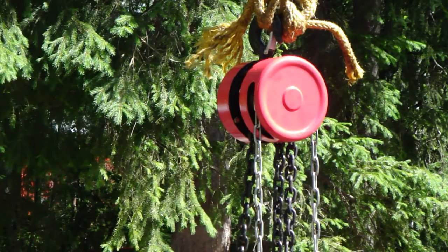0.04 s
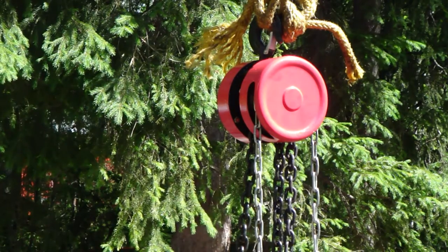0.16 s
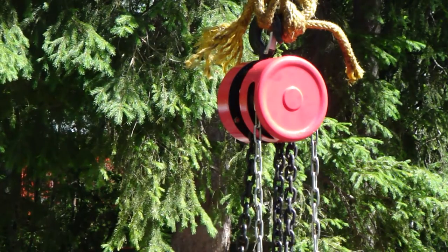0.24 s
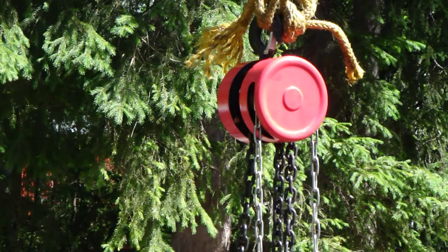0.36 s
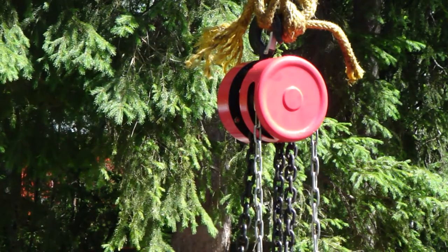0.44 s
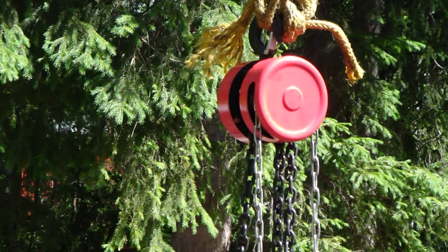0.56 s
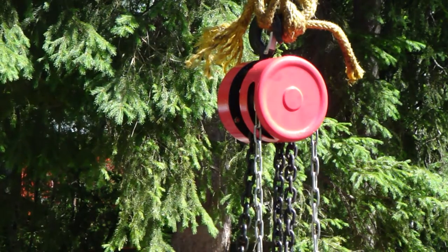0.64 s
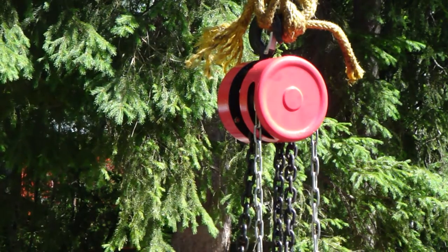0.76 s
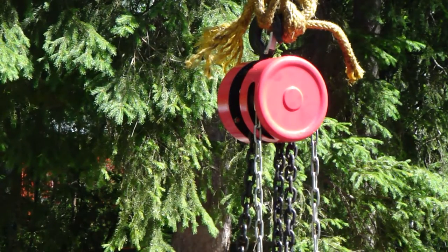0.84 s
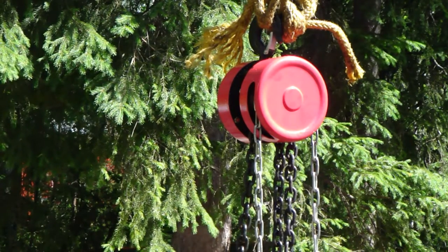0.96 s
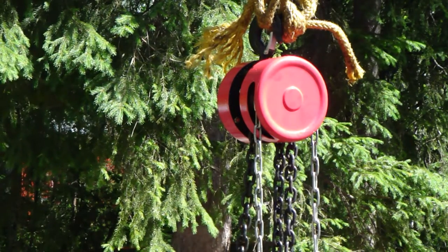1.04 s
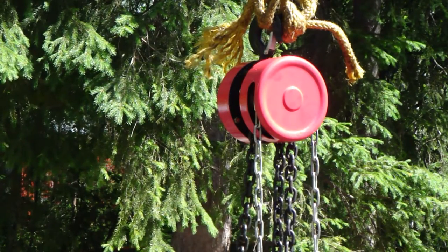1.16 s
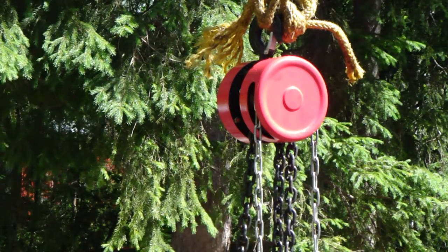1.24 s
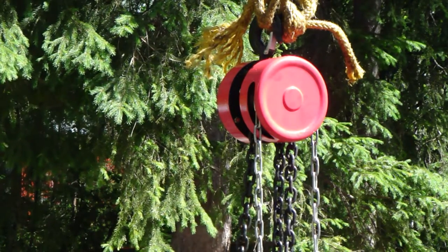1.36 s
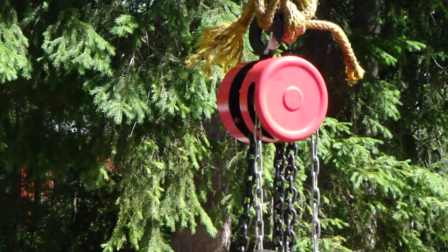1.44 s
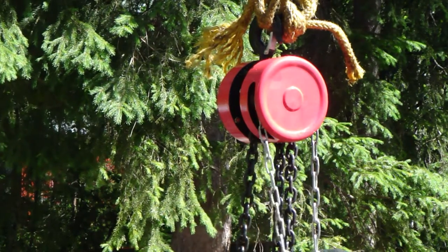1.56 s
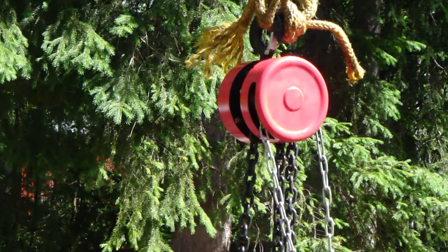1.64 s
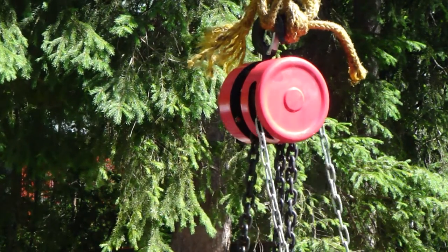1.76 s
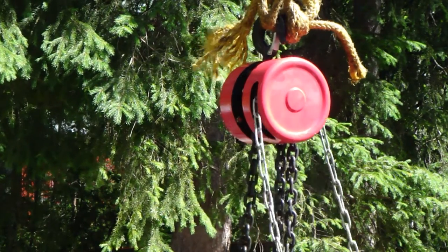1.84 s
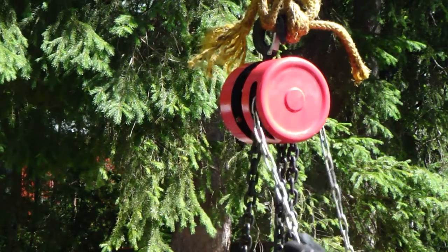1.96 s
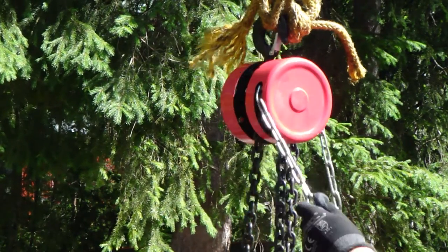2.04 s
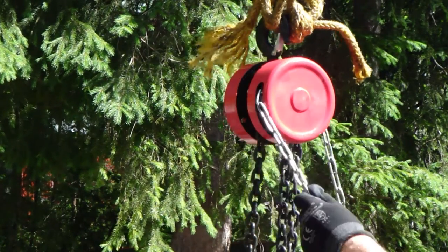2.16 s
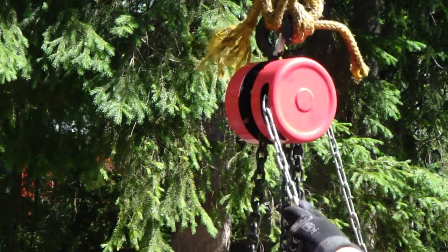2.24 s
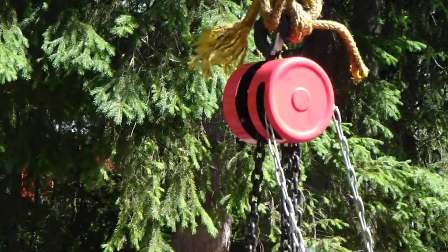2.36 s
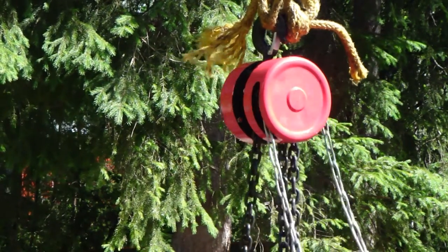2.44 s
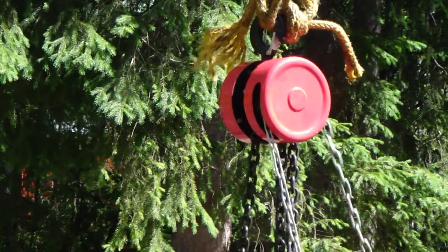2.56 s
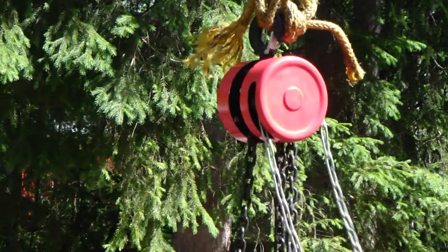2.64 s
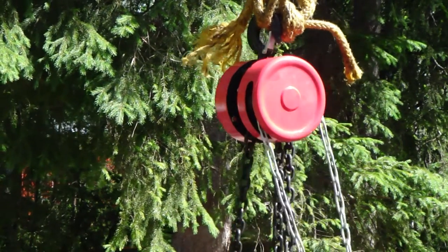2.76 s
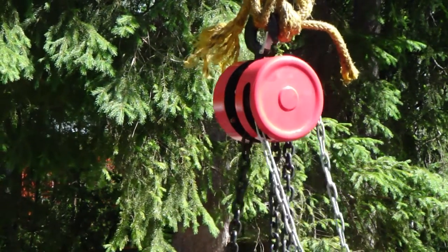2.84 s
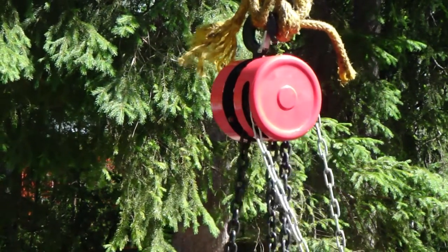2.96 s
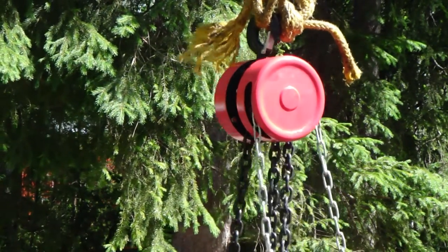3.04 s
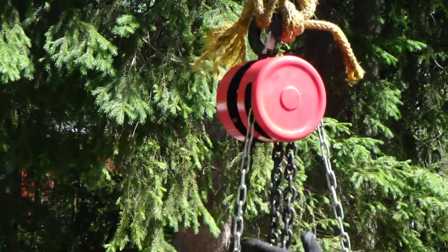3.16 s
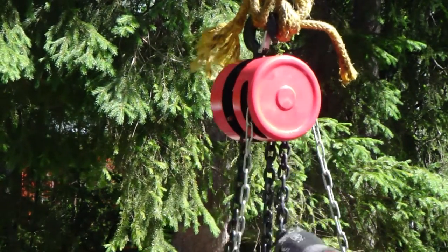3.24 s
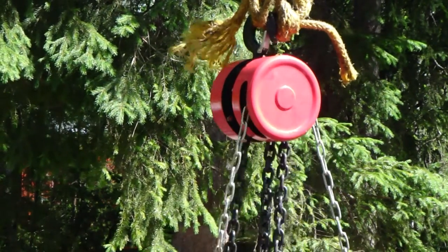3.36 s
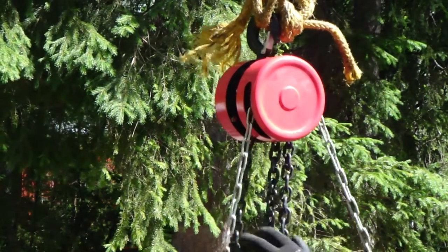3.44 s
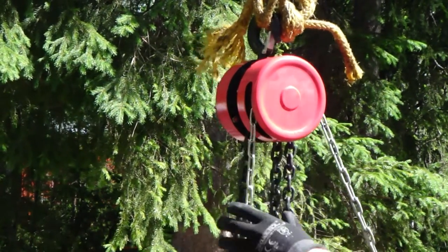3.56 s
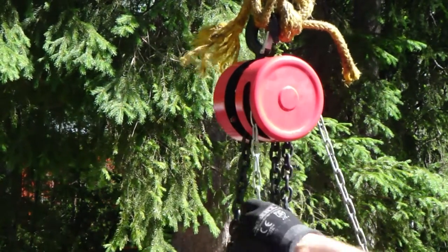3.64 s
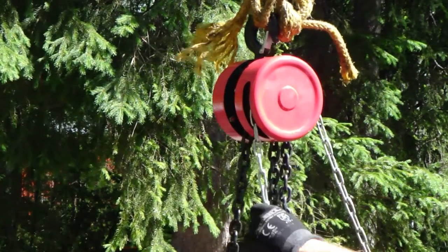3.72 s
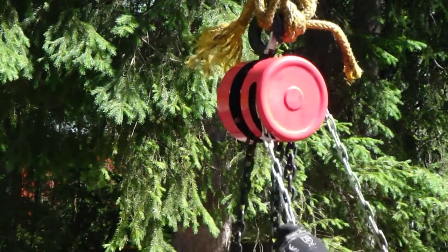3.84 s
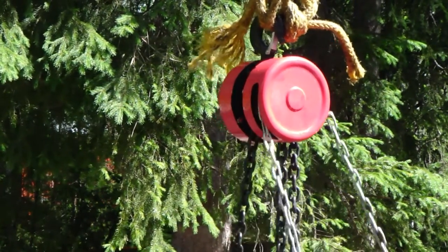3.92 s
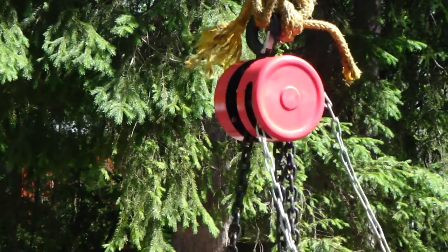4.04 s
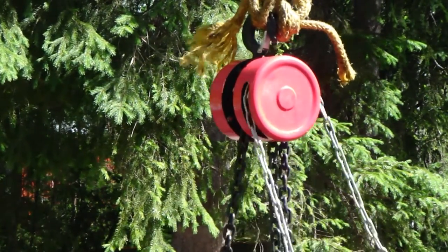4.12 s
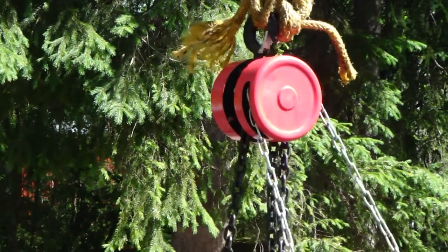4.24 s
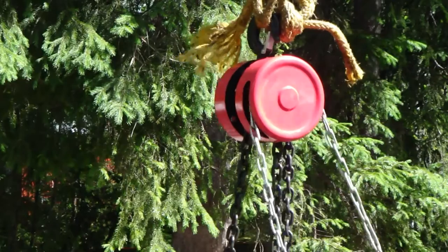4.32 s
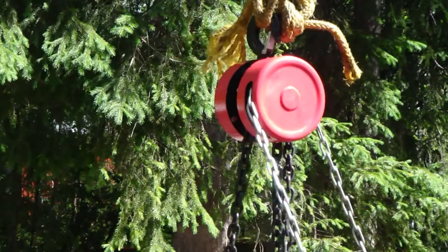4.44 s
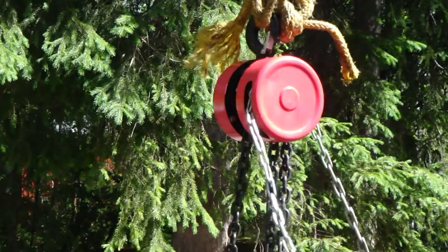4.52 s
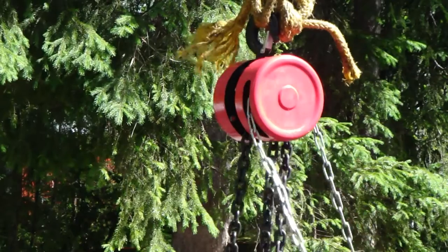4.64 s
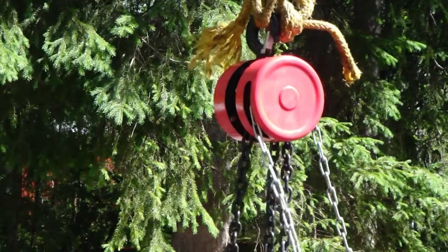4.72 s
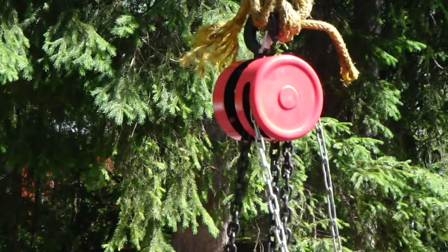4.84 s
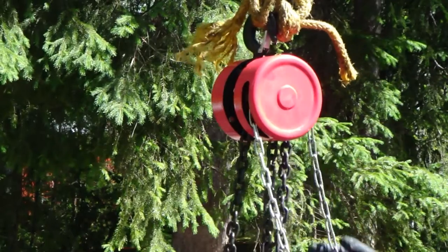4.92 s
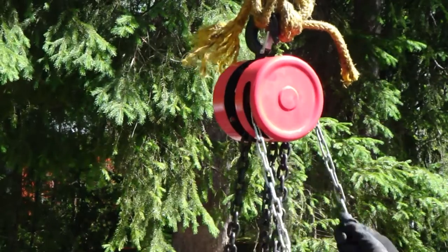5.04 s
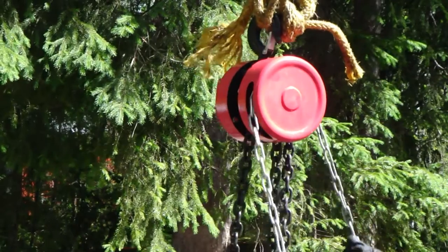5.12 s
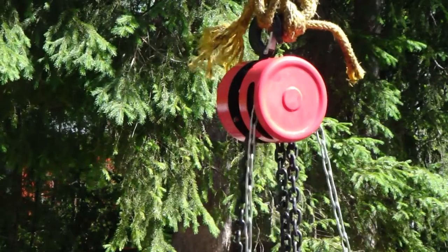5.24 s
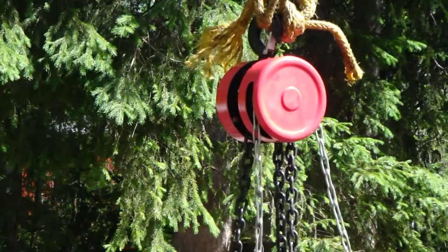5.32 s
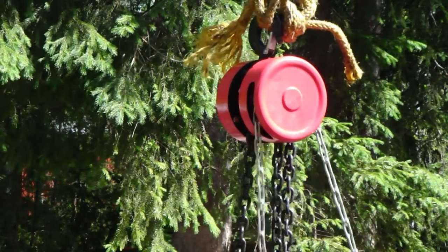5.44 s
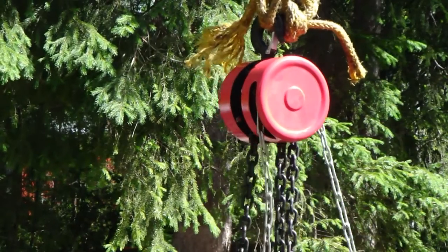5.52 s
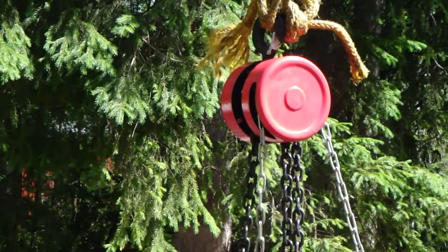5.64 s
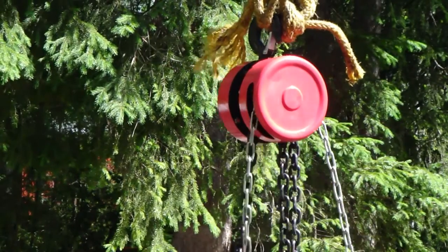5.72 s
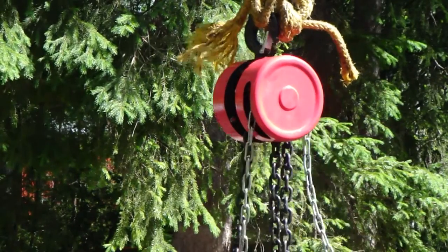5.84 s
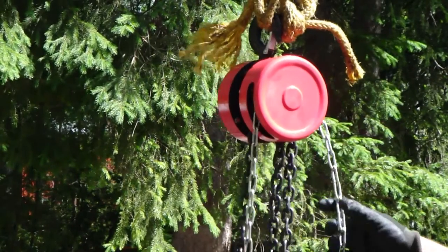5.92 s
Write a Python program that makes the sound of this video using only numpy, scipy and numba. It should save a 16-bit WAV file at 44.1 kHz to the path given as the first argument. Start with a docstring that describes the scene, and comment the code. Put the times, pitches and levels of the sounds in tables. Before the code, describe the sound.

A hand chain is hauled in five pulls through a steel hoist outdoors, links knocking, clinking, grinding and squeaking, ending with fast ratchet ticks.

```python
"""Chain hoist among trees

A hand chain is hauled through a steel chain hoist in five pulls: links knock into the wheel pockets, clink, grind
and squeak, slack chain slaps the cover, and a pawl ticks in the fast last pull. Noise cracks excite damped modes.
Under it lie filtered-noise forest hush, thin far whistles of gliding narrow noise and grainy rustles of clothes.
A gain control lowers everything as the recent output grows louder, and a limiter holds the sharpest hits."""
import sys
import numpy as np
from scipy import signal
from scipy.fft import rfft, irfft
from scipy.io import wavfile
from scipy.ndimage import uniform_filter1d, minimum_filter1d
from numba import njit

SR = 44100
rng = np.random.default_rng(int(sys.argv[2]) if len(sys.argv) > 2 else 0)


def wrap_up_sound(samples):
    """Save the sound to the file named by the first command line argument, as 16-bit audio."""
    columns = np.atleast_2d(samples).T
    # keep every value between -1 and 1, then stretch to whole-number steps
    tamed = np.clip(columns, -1, 1)
    steps = np.round(tamed * 32767).astype(np.int16)
    wavfile.write(sys.argv[1], SR, steps)


N = 263718  # samples in the scene
SIZE = 16384  # samples in one blow or filter
T, HZ = np.arange(SIZE) / SR, np.fft.rfftfreq(SIZE, 1 / SR)


def gain_of(db):
    """Level definition: decibels become an amplitude factor."""
    return 10 ** (np.asarray(db) / 20)


def evened(x):
    """Power normalisation: scales a signal to rms 1."""
    return x / np.sqrt(np.mean(x ** 2) + 1e-20)


def read(points, hz):
    """Logarithmic pitch scale: interpolates a table along log frequency."""
    f, value = np.transpose(points)
    return np.interp(np.log(hz + 1), np.log(f + 1), value)


def add(mix, s, sound):
    """Superposition: adds a two-channel sound to the mix at time s."""
    part = mix[:, max(round(s * SR), 0):][:, :sound.shape[1]]
    part += sound[:, :part.shape[1]]


def causal(db):
    """Minimum phase: the response with this gain that rings only after the blow, by folding the cepstrum."""
    cepstrum = irfft(np.log(gain_of(db)))
    fold = np.r_[1, np.full(SIZE // 2 - 1, 2), 1, np.zeros(SIZE // 2 - 1)]
    return np.exp(rfft(cepstrum * fold))


def coloured(x, colour):
    """Linear filtering: convolves a long sound with the response of a spectrum."""
    response = irfft(causal(read(colour, HZ)))[None]
    return signal.oaconvolve(x, response, axes=1)[:, :x.shape[1]]


def pair(size, apart):
    """Partial coherence: two channels share one noise and differ by a second one, weighted apart."""
    mid, side = rng.standard_normal((2, size))
    return np.array([mid + apart * side, mid - apart * side]) / np.hypot(1, apart)


def narrow(hz, width_hz):
    """Heterodyning: lowpassed complex noise is shifted along the curve hz to make a fuzzy tone."""
    pole = np.exp(-np.pi * width_hz / SR)
    noise = pair(len(hz), 0.54) + 1j * pair(len(hz), 0.57)
    haze = signal.lfilter([1], np.poly([pole, pole]), noise)
    carrier = np.exp(2j * np.pi * np.cumsum(hz) / SR)
    return evened((haze * carrier).real)


def ring(modes, detune=0.00785):
    """Modal decay: each blow shares its force differently among damped modes and shifts their pitch slightly."""
    hz, db, t60 = np.transpose(modes)[:, :, None]
    force, turn, skew, shift = rng.standard_normal((4, len(modes), 1))
    swing = gain_of(db + 5.4 * force - 60 * T / t60)
    angle = 2 * np.pi * (hz * (1 + detune * shift) * T + turn)
    return np.array([(swing * np.sin(angle + side * 0.26 * skew)).sum(0) for side in (-1, 1)])


def crack(t60, tail_db, tail_t60, bounce_s=0.0034, count=4):
    """Impact with rebound: a sharp contact, mostly weakening bounces, and a longer tail of chatter."""
    at = np.r_[0, np.cumsum(bounce_s * rng.uniform(.3, 1.7, count - 1))][:, None]
    force_db = -6 * np.arange(count)[:, None] * rng.uniform(.6, 1.4, (count, 1))
    contacts = (gain_of(force_db - 60 * abs(T - at) / t60) * (T >= at)).sum(0)
    chatter = pair(SIZE, 0.37) * gain_of(tail_db - 60 * T / tail_t60)
    return pair(SIZE, 0.33) * contacts + chatter


def own_voice(spread_db, width_hz):
    """Dependence on striking point: a random smooth response favours other resonances at every blow."""
    knots = np.arange(len(HZ)) * width_hz
    return causal(spread_db * np.interp(HZ, knots, rng.standard_normal(len(HZ))))


def strength(spectrum, lo, hi):
    """Band level: the rms between lo and hi Hz over the first 6 ms of a blow."""
    onset = irfft(spectrum.mean(0) * (HZ > lo) * (HZ < hi))[:260]
    return np.sqrt(np.mean(onset ** 2))


# spectrum of the forest hush: (frequency [Hz], relative level [dB])
FOREST_COLOUR = [(25, -55), (70, -25), (140, -10.5), (350, 0.5), (480, -3.5), (950, -4.5), (1400, -7.5),
                 (2700, -16), (5000, -18), (11000, -21)]
# correlation of the two channels in the hush: (frequency [Hz], correlation [-1 to 1])
FOREST_CORRELATION = [(60, -0.64), (400, -0.7), (2600, -0.31), (5500, -0.067)]


def forest():
    """Stereo widening: the wide hush is drifting noise whose lows are largely opposite in the two channels."""
    frames, hz = N // 256 + 5, np.fft.rfftfreq(1024, 1 / SR)
    a, b, c, d, patches = rng.standard_normal((5, frames, len(hz)))
    patches = uniform_filter1d(patches, size=24, axis=0)  # over time
    patches = evened(uniform_filter1d(patches, size=10, axis=1))  # over frequency
    same = np.clip(read(FOREST_CORRELATION, hz), -1, 1)
    left = a + 1j * b
    right = same * left + np.sqrt(1 - same ** 2) * (c + 1j * d)
    z = np.array([left, right]) * gain_of(read(FOREST_COLOUR, hz) + 1.9 * patches)
    hush = signal.istft(z.swapaxes(1, 2), nperseg=1024, noverlap=768)[1][:, :N]
    return gain_of(-38.0) * evened(hush)


# thin far whistles: (time [s], length [s], start [Hz], middle [Hz], end [Hz], relative level [dB])
WHISTLES = [(.01, 0.18, 5300, 5920, 5200, -39.5), (1.161, 0.079, 6650, 6600, 6600, -46),
            (1.245, 0.15, 6900, 6380, 5550, -40.5), (1.412, 0.16, 6700, 6020, 5000, -45)]


def whistles():
    """Narrow-band noise: breathy glides, each with an equal one above it and a wide band around it."""
    out = np.zeros((2, N))
    for s, length, *pitch, db in WHISTLES:
        u = np.linspace(0, 1, int(length * SR))
        hz = np.polyval(np.polyfit([0, .5, 1], pitch, 2), u)
        tone = narrow(hz, 100) + narrow(hz * 1.28, 420) + gain_of(0.5) * narrow(hz, 1800)
        add(out, s, gain_of(db - 7) * tone * signal.windows.tukey(len(u), .5))
    return out


# strokes of cloth: (time [s], length [s], relative level [dB])
RUSTLES = [(0.251, .035, -34.5), (0.284, .075, -27.5), (0.412, .025, -34.5), (1.032, 0.075, -37.5),
           (1.181, .02, -38), (1.563, 0.022, -37)]
# spectrum of brushing cloth: (frequency [Hz], gain [dB])
RUSTLE_COLOUR = [(100, -9), (500, 4), (2000, 1.5), (5000, 4.5), (8500, 6), (11000, 0.5)]


def rustles():
    """Friction noise: cloth brushes on cloth in short grainy strokes."""
    out = np.zeros((2, N))
    for s, length, db in RUSTLES:
        u = np.linspace(0, 1, int(length * SR))
        grains = coloured(pair(len(u), 0.61) * rng.exponential(1, len(u)), RUSTLE_COLOUR)
        stroke = evened(grains * np.sqrt(u) * (1 - u))
        add(out, s, gain_of(db - 6.0) * stroke)
    return out


# level difference of the hoist between the channels: (frequency [Hz], left minus right [dB])
BALANCE = [(150, -7.5), (600, 7.5), (1130, 5.5), (2020, 5), (3630, 2.5), (6500, 0)]


def placed(x):
    """Radiation and scattering: a small source lacks bass; it leans left, and trunks and branches add a tail."""
    x = signal.sosfilt(signal.butter(3, 270, "high", fs=SR, output="sos"), x)
    lean = [irfft(causal(side * read(BALANCE, HZ) / 2)) for side in (1, -1)]
    echoes = rng.standard_normal((2, SIZE)) * (rng.random((2, SIZE)) < .05)  # sparse
    scatter = echoes * gain_of(-60 * T / 0.11) * (T > .012)
    paths = lean + gain_of(-14.5) * scatter / np.linalg.norm(scatter[0])
    return signal.oaconvolve(x, paths, axes=1)[:, :N]


# slack chain hitting the cover: (time [s], relative level [dB])
SLAPS = [(3.357, -6), (3.3602, -6), (3.3736, -9), (3.3844, -6), (3.4054, -2), (3.4956, -3), (4.9558, -4),
         (4.9653, -1.5), (4.9946, -9), (5.07, -9.5), (5.142, -10), (5.1742, -8), (5.689, -7.5)]
THUMP_DB, THUMP_S = -46, 0.0015  # peak relative to the slap's row, time to the peak


def thumps():
    """Overload: each slap brings a faint low thump, one smooth pulse, as from an overdriven microphone."""
    out, pulse = np.zeros((2, N)), T / THUMP_S * np.exp(1 - T / THUMP_S)
    for s, db in SLAPS:
        add(out, s, gain_of(db + THUMP_DB) * np.array([pulse, pulse]))
    return out


# spectrum of the slap's dense short-lived modes: (frequency [Hz], gain [dB])
SLAP_COLOUR = [(60, -70), (400, -40), (1000, -21.5), (1650, -5), (2300, -13.5), (4100, 0.5), (4900, -4),
               (7500, -2), (11000, -4.5)]
# modes of the sheet cover: (frequency [Hz], relative level [dB], 60 dB decay time [s])
COVER_MODES = [(670, -10, 0.35), (1406, -8, 0.23), (1763, -9.5, 0.11), (1920, -3, 0.13), (3640, -29, .04)]


def slaps():
    """Plate excitation: slack chain strikes the sheet cover, which hums on in its modes."""
    out, colour = np.zeros((2, N)), causal(read(SLAP_COLOUR, HZ))
    for s, db in SLAPS:
        blow = crack(t60=.008, tail_db=-14, tail_t60=.07, bounce_s=.0012)
        z = rfft(blow) * colour + gain_of(-32.0) * rfft(ring(COVER_MODES))
        z = z * own_voice(spread_db=1.5, width_hz=540)
        add(out, s, gain_of(db) * irfft(z) / strength(z, 1200, 11000))
    return gain_of(-4.0) * out


def wheel_clunk(s=2.5, db=-13):
    """Impact: one hollow clunk of the wheel during the second pull."""
    out = np.zeros((2, N))
    colour = causal(read([(400, -47), (700, -13), (1100, -11), (1700, 6), (2900, 2), (4000, -25), (11000, -23)], HZ))
    z = rfft(crack(t60=0.0055, tail_db=-12, tail_t60=0.031, bounce_s=0.0038)) * colour
    add(out, s, gain_of(db) * irfft(z) / strength(z, 400, 3300))
    return out


def beats(first_s, number, per_s):
    """Kinematics: passing times of links or teeth as speed bends through start, middle and end values."""
    progress = np.linspace(0, 1, round(number) - 1)
    speed = np.polyval(np.polyfit([0, .5, 1], per_s, 2), progress)
    return first_s + np.r_[0, np.cumsum(1 / speed)]


# spectrum of a pawl tick: (frequency [Hz], gain [dB])
PAWL_COLOUR = [(500, -41), (3000, -26), (6500, -7.5), (7400, 7), (8500, -7), (9500, 0), (11000, 0)]
PAWL_S, PAWL_TEETH = 5.208, 22  # first tooth [s], number of teeth
PAWL_PER_S = (52.1, 77.8, 41.9)  # teeth per second at start, middle and end
PAWL_DB, PAWL_DRIFT_DB = -5, -17  # relative level at the first tooth, change per second


def pawl():
    """Ratchet excitation: the spring-loaded pawl gives one small dry tick for each tooth."""
    out, colour = np.zeros((2, N)), causal(read(PAWL_COLOUR, HZ))
    for s in beats(PAWL_S, PAWL_TEETH, PAWL_PER_S):
        db = PAWL_DB + PAWL_DRIFT_DB * (s - PAWL_S) + 1.5 * rng.standard_normal()
        z = rfft(crack(t60=.01, tail_db=-15, tail_t60=.04, bounce_s=.001, count=2)) * colour
        add(out, s, gain_of(db) * irfft(z) / strength(z, 6500, 11000))
    return gain_of(-4.5) * out


# links sliding on each other: (time [s], nominal length [s], relative level [dB])
SQUEAKS = [(1.968, 0.011, -23), (2.454, 0.018, -23), (2.762, 0.0096, -15), (2.79, 0.018, -18.5),
           (3.028, 0.0091, -37), (3.6, 0.0077, -35), (3.835, 0.017, -27.5), (4.328, 0.017, -14.5),
           (4.838, 0.022, -31), (4.892, 0.042, -30), (5.026, 0.016, -34), (5.209, 0.013, -14.5),
           (5.648, 0.012, -25)]
# a seated link slides on the next: delay, nominal length, level relative to its clink's row
SLIDE_AFTER_S, SLIDE_S, SLIDE_DB = 0.012, 0.0099, -17.5


def squeaks(touched):
    """Friction excitation: steel slides on steel and briefly excites the bending modes of a link."""
    out = np.zeros((2, N))
    slides = [(s + SLIDE_AFTER_S, SLIDE_S, db + SLIDE_DB) for s, db, _ in touched]
    for s, length, db in SQUEAKS + slides:
        steady = np.full(int(1.71 * length * SR), 1 + .015 * rng.standard_normal())
        tone = narrow(6150 * steady, 260)
        tone = tone + gain_of(-2.0) * narrow(5450 * steady, 290)
        tone = tone + gain_of(-5.5) * narrow(10300 * steady, 600)
        add(out, s, gain_of(db + 3) * tone * signal.windows.tukey(len(steady), .5))
    return out


def rattle(level_db, colour, modes, ring_db, per_s, spread_db, count=12):
    """Shot noise: many random small contacts at places that each ring their own way; weak motion makes fewer."""
    out, tint, level = np.zeros((2, N)), causal(read(colour, HZ)), gain_of(level_db)
    busy = np.clip(gain_of(0.47 * (level_db + 18.0)), .2, 1)
    for _ in range(count):
        force = gain_of(spread_db * np.minimum(rng.exponential(1, N), 3)) * rng.choice([-1, 1], N)
        chance = busy * per_s / count / SR
        contacts = evened(force) * (rng.random(N) < chance) / np.sqrt(chance) * level
        impact = rfft(crack(t60=0.0056, tail_db=-14.5, tail_t60=0.022, bounce_s=0.0028))
        blow = irfft(impact * tint * own_voice(spread_db=6.0, width_hz=407))
        blow = blow + gain_of(ring_db) * ring(modes)
        blow = blow / np.linalg.norm(blow.mean(0))
        out += signal.oaconvolve(contacts[None], blow, axes=1)[:, :N]
    return out / np.sqrt(count)


RELEASE_DB = -24.5  # the fall over one release time


def effort_db(t, start, attack, hold, release, drift_db):
    """Motion envelope: the chain gathers speed, runs on while the arm gains or tires, and dies away."""
    held = t - start - attack
    rise_db = 20 * np.log10(np.clip((t - start) / attack, 1e-5, 1))
    return rise_db + drift_db * np.clip(held, 0, hold) + RELEASE_DB * np.maximum(held - hold, 0) / release


# spells of chain movement, pulls and swaying after them: (start [s], attack [s], hold [s], release [s],
# drift [dB/s], relative grinding level [dB], relative jingle level [dB])
MOVES = [(1.69, 0.26, .23, 0.033, -31, -23, -21.5), (2.264, 0.12, 0.493, 0.095, -18.5, -15, -12),
         (3.285, 0.038, 0.35, 0.24, -34, -31.5, -31), (3.815, 0.038, 0.31, 0.13, 30.5, -18, -18.5),
         (4.311, 0.05, 0.24, 0.063, 1.5, -18.5, -10), (4.66, .02, 0.4, 0.14, -3, -32, -31.5),
         (5.057, 0.13, 0.33, 0.089, -13.5, -15, -6), (5.636, 0.037, 0.014, 0.037, 0, -21, -16.5),
         (5.755, 0.042, 0.0069, 0.035, -10, -18, -8.5), (5.905, 0.016, .02, 0.029, -10, -19.5, -28)]
# spectra of wheel and jingling links, dense short-lived modes: (frequency [Hz], gain [dB])
WHEEL_COLOUR = [(60, -54), (330, -40.5), (440, -3), (530, -14.5), (680, 4), (760, -10.5), (870, 1.5),
                (1350, -1.5), (2100, -5), (2560, 8.5), (3000, -0.5), (3500, -9.5), (6000, -9), (11000, -13)]
JINGLE_COLOUR = [(300, -87), (2000, -9.5), (4200, -4), (4750, -6), (5300, -12), (6150, 5.5), (7100, -9.5),
                 (9600, -2), (10300, -8), (11200, -9.5)]
# modes of wheel and housing, and free ring of the links:
# (frequency [Hz], relative level [dB], 60 dB decay time [s])
HOUSING_MODES = [(436, -12.5, 0.11), (691, -16, 0.21), (873, 0, 0.069), (1101.3, -4, 0.14),
                 (1738, -3.5, 0.07), (2522, 6.5, 0.032), (2394, -0.5, 0.063), (2460, -8, 0.2),
                 (2982, 9.5, 0.058), (3390, -12, 0.17)]
LINK_MODES = [(4410, -10.5, 0.5), (5060, 1, 0.11), (5760, -5, 0.052), (5270, -2, 0.21), (5960, -1.5, 0.15),
              (6400, 1, 0.1), (6940, -0.5, 0.16), (8380, -4.5, 0.14), (9300, -17, .18), (10100, 8, 0.041),
              (10770, 2.5, 0.057)]
SURGE, SURGE_S = 1.1, 0.013  # added share as a link seats, its decay time constant


def running_chain(seated):
    """Distributed excitation: chain grinds in the wheel, loose links jingle; both surge as each link seats."""
    t = np.arange(N) / SR
    grind = sum(gain_of(effort_db(t, *shape) + db) for *shape, db, _ in MOVES)
    jingle = sum(gain_of(effort_db(t, *shape) + db) for *shape, _, db in MOVES)
    jolts = np.bincount([round(row[0] * SR) for row in seated], minlength=N)[:N]
    surge = 1 + SURGE * signal.lfilter([1], [1, -np.exp(-1 / (SURGE_S * SR))], jolts)
    grind_db, jingle_db = 20 * np.log10(surge * np.array([grind, jingle]) + 1e-6)
    wheel = rattle(grind_db - 3.5, WHEEL_COLOUR, HOUSING_MODES, ring_db=-25.0, per_s=430, spread_db=3.5)
    links = rattle(jingle_db - 4.5, JINGLE_COLOUR, LINK_MODES, ring_db=-28, per_s=400, spread_db=3.5)
    return wheel + links


# links running over the wheel in the first four pulls:
# (first link [s], number of links, links at start [1/s], at middle [1/s], at end [1/s])
PULLS = [(1.7752, 11, 15.46, 32.37, 19.47), (2.3682, 13, 23.74, 24.15, 24.35),
         (3.8626, 8, 17.78, 21.6, 33.1), (4.3358, 6, 15.82, 21.0, 15.28)]
# how those links strike, pull by pull, before effort and chance: (relative knock level [dB], body balance [dB],
# relative clink level [dB], balance of its 3.2-6.5 kHz part [dB])
STRIKES = [(-20.5, -10, -9.5, -2.5), (-4.5, -14, -11.5, -2), (-13.5, -19.5, -18, -26),
           (-6.5, -8.5, -9.5, -25)]
LINK_SPREAD_DB = 1.5  # no two links seat equally hard


def seatings():
    """Periodic impact: each arriving link knocks its pocket and clinks its neighbour, as hard as the pull."""
    knock_rows, clink_rows = [], []
    for (first_s, links, *per_s), (knock_db, body_db, clink_db, dull_db) in zip(PULLS, STRIKES):
        for s in beats(first_s, links, per_s):
            force_db = max(effort_db(s, *move[:5]) for move in MOVES)
            luck_db = LINK_SPREAD_DB * rng.standard_normal(4)
            knock_rows.append((s, knock_db + force_db + luck_db[0], body_db + luck_db[1]))
            clink_rows.append((s, clink_db + force_db + luck_db[2], dull_db + luck_db[3]))
    return knock_rows, clink_rows


# swinging links striking each other: (time [s], relative level above 6.5 kHz [dB],
# balance of the 3.2-6.5 kHz part against it [dB])
CLINKS = [(1.6623, -45.5, 15), (1.73, -41, 14), (2.0503, -17, -1), (2.3847, -16.5, 8), (2.404, -12, 3),
          (2.5186, -9.5, -4), (2.6494, -6, 0.5), (2.867, -11, 2), (3.0415, -17.5, 9), (3.1382, -13, -9),
          (3.32, -22, 1.5), (3.3288, -15, -3), (3.4198, -17.5, -2), (3.449, -27, -12), (3.47, -26, -14),
          (3.487, -23.5, -3), (3.501, -16.5, 0.5), (3.5393, -21, 2), (3.5731, -18.5, 5),
          (3.6847, -14, -3.5), (3.7007, -37, 11), (3.8075, -30.5, -1), (3.9205, -23, 6), (3.9354, -19, 3),
          (3.9844, -9.5, 1), (4.9327, -15.5, -3), (5.1661, -1, -6), (5.2944, -7.5, 4), (5.5806, -12.5, 0),
          (5.6561, -35, 0), (5.6757, -19.5, 6.5), (5.733, -16.5, -2), (5.7719, -15, -5.5),
          (5.8141, -11, -7), (5.8615, -13.5, 1), (5.9217, -16.5, -2.5)]
# spectrum of a clink's dense short-lived modes: (frequency [Hz], gain [dB])
LINK_COLOUR = [(300, -34), (1200, -16), (3000, -4.5), (4200, -6), (4750, -7.5), (5300, -3), (6200, 4),
               (7000, 3.5), (8300, 4.5), (9700, 7.5), (10400, 8), (11200, -4)]


def clinks(rows):
    """Collision of small stiff bodies: link meets link in a bright crack with a faint modal ring."""
    out, colour = np.zeros((2, N)), causal(read(LINK_COLOUR, HZ))
    low = 1 / (1 + (HZ / 6500) ** 12)
    for s, db, dull_db in rows:
        blow = crack(t60=.011, tail_db=-11, tail_t60=.06, bounce_s=.002)
        z = rfft(blow) * colour + gain_of(-31) * rfft(ring(LINK_MODES))
        z = z * own_voice(spread_db=5.5, width_hz=431)
        top, middle = strength(z, 6500, 11000), strength(z, 3200, 6500)
        z = z * causal(low * (dull_db - 20 * np.log10(middle / top)))
        add(out, s, gain_of(db) * irfft(z) / top)
    return gain_of(-1.5) * out


# single hard knocks, where a link catches, jumps or stops in the wheel: (time [s],
# relative level at 2.2-3.3 kHz [dB], balance of the hollow body below 2 kHz, before a common offset [dB])
KNOCKS = [(1.8222, -19, -3.5), (1.877, -19.5, -4), (1.9371, -14, -4), (2.0775, -9, -8.5),
          (2.155, -13.5, -6), (2.327, -17, -1.5), (2.3457, -9, -5), (2.453, -9, -5), (2.6318, -6, -6),
          (2.9078, -12.5, -8), (3.0392, -15.5, -2.5), (3.874, -10.5, -12), (3.9188, -4, -37),
          (3.9372, -10.5, -5.5), (4.6975, -13, -7.5), (4.7878, -24, -1), (5.11, -6.5, -11.5),
          (5.1428, -6.5, -29), (5.4147, -5.5, -9), (5.791, -18, 0), (5.92, -15, -5)]


def knocks(rows):
    """Structural excitation: a link drops into its pocket and rings wheel and housing, each with its own body."""
    out, colour = np.zeros((2, N)), causal(read(WHEEL_COLOUR, HZ))
    low = 1 / (1 + (HZ / 2100) ** 8)
    for s, db, body_db in rows:
        blow = crack(t60=.011, tail_db=-13, tail_t60=.085, bounce_s=.004)
        z = rfft(blow) * colour + gain_of(-25.5) * rfft(ring(HOUSING_MODES))
        z = z * own_voice(spread_db=1.5, width_hz=318)
        rim, body = strength(z, 2200, 3300), strength(z, 400, 2000)
        z = z * causal(low * (body_db - 2.5 - 20 * np.log10(body / rim)))
        add(out, s, gain_of(db) * irfft(z) / rim)
    return gain_of(-2) * out


def scene():
    """Superposition of sources: the hoist in front of the forest."""
    seated, touched = seatings()
    hoist = slaps() + wheel_clunk() + pawl() + squeaks(touched) + running_chain(seated)
    hoist = hoist + clinks(touched + CLINKS) + knocks(seated + KNOCKS)
    return forest() + whistles() + rustles() + thumps() + placed(hoist)


@njit
def gain_control(size, depth_db, lag_samples):
    """Feedback compression: the gain falls in step with the recent mean size of the output."""
    gain, recent = np.ones(len(size)), 0.
    for i in range(len(size)):
        gain[i] = 10 ** (-depth_db * recent / 20)
        recent += (size[i] * gain[i] - recent) / lag_samples
    return gain


EDGE_HZ = 11180  # upper band limit


def record(dry):
    """Band limitation and dynamics: lowpass, gain control, fast limiter on the sharpest hits, lowpass again."""
    edge = signal.firwin(301, EDGE_HZ, window=("kaiser", 7), fs=SR)[None]
    heard = signal.oaconvolve(dry, edge, "same", axes=1)
    heard = heard * gain_control(abs(heard).mean(0), depth_db=75.5, lag_samples=.28 * SR)
    headroom = .97 / np.maximum(abs(heard).max(0), .97)
    limited = heard * uniform_filter1d(minimum_filter1d(headroom, size=61), size=61)
    return signal.oaconvolve(limited, edge, "same", axes=1)


dry = scene()
out = record(dry)
wrap_up_sound(out)
```